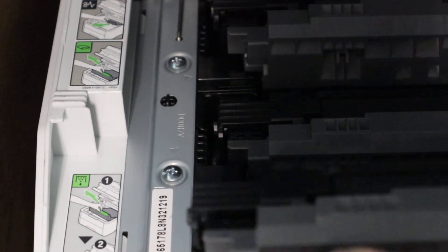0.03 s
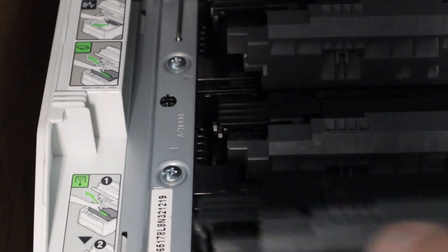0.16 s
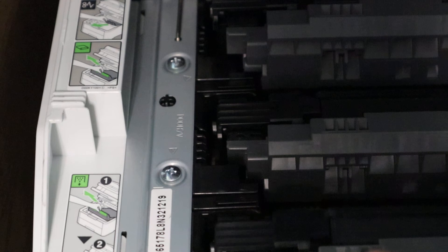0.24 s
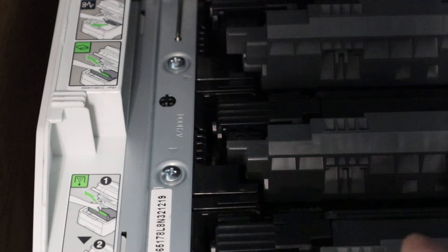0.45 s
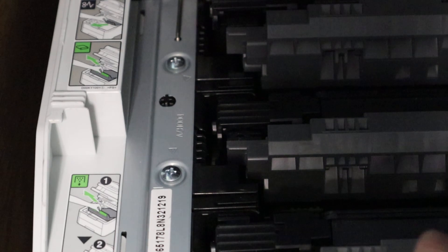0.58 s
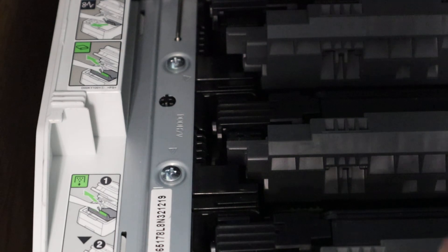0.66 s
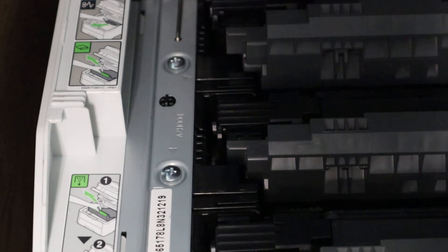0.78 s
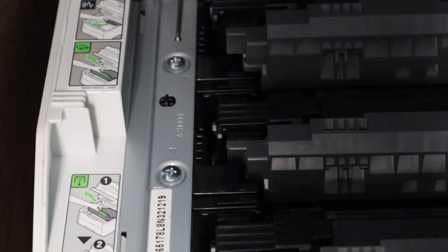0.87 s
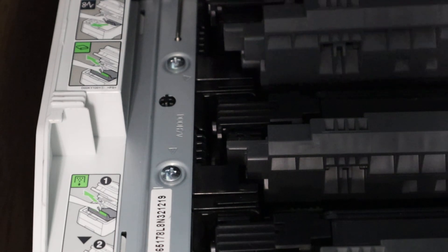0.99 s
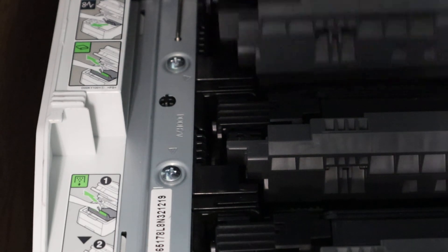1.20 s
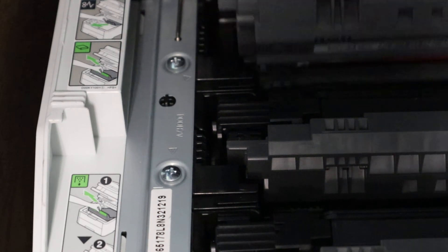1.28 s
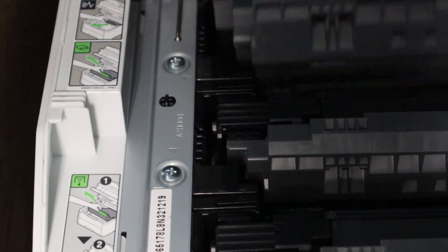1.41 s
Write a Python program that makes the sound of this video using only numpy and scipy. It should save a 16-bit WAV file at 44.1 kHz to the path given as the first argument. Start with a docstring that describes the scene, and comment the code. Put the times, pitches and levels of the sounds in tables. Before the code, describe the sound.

Close to the microphone, a toner cartridge slides down a printer's guides, chatters and clunks loudly into place. After a short pause come a light click and quiet plastic handling, with a faint machine hum in the small room.

```python
"""A faint machine hum fills a small room. Close up, a plastic toner cartridge ticks against an open
printer and scrapes down its guides, groaning as it sticks and slips while the frame rumbles.
It chatters past the latch and seats with a loud clunk that rings the chassis. A light click and a
soft knock follow, then the next cartridge is handled, its hollow shell rubbing and ticking."""
import sys
import numpy as np
from scipy import signal
from scipy.fft import rfft, irfft
from scipy.io import wavfile

SR = 44100
rng = np.random.default_rng(int(sys.argv[2]) if len(sys.argv) > 2 else 0)


def to_wav(s):
    """Save 16-bit WAV."""
    ch = np.atleast_2d(s).T  # columns
    pcm = np.round(np.clip(ch, -1, 1) * 32767)  # PCM
    wavfile.write(sys.argv[1], SR, pcm.astype(np.int16))


N = 63945
T = np.arange(N) / SR


def from_db(db):
    """Decibels to gain."""
    return 10 ** (np.asarray(db) / 20)


def unit_rms(x):
    """Normalise to an RMS of one."""
    return x / np.sqrt(np.mean(x ** 2) + 1e-20)


def fader(curve):
    """A gain ride through (time_s, level_db) points."""
    return from_db(np.interp(T, *np.transpose(curve)))


def at_hz(points, hz):
    """Read a curve on a log-frequency axis."""
    freq_hz, value = np.transpose(points)
    return np.interp(np.log(hz + 1e-9), np.log(freq_hz), value)


def coloured(x, eq):
    """Shape a steady signal with an EQ curve, then normalise it."""
    gain = from_db(at_hz(eq, np.fft.rfftfreq(len(x), 1 / SR)))
    return unit_rms(irfft(rfft(x) * gain, len(x)))


def drift(rate_hz):
    """A smooth random wobble, mostly slower than rate_hz."""
    rolloff = 1 + (np.fft.rfftfreq(N, 1 / SR) / rate_hz) ** 2
    return unit_rms(irfft(rfft(rng.standard_normal(N)) / rolloff, N))


def add(out, start_s, x):
    """Drop a sound onto the timeline."""
    i = int(start_s * SR)
    out[i:i + len(x)] += x[:max(N - i, 0)]


def strike(t, attack_s, t60_s):
    """Percussive envelope: quick rise, exponential decay."""
    return (1 - np.exp(-t / attack_s)) * from_db(-60 * t / t60_s)


# Tone colour of the room air: freq_hz, gain_db
AIR_EQ = [(25, 3), (60, 5), (100, -12), (160, -2.5), (200, -4.5), (280, -11), (340, -3.5), (600, -5),
          (720, -7.5), (1800, -15.5), (2150, -15), (3000, -19.5), (4300, -18.5), (4900, -18.5),
          (5650, -18.5), (6200, -23), (9000, -25), (12000, -25), (15500, -29.5)]
# Tones of the machine hum: pitch_hz, level_db
HUM_TONES = [(118.4, -60.5), (158, -62.5), (280, -62.5), (523.5, -58.5), (580, -59), (647, -58),
             (1109, -67), (1200, -66.5), (2158, -62.5), (4813, -75), (5604, -74.5)]

def background(air_db=-49.5, waver_rad=0.4, flutter=0.2):
    """The bed: room air and the wavering tones of a running machine."""
    hum = np.zeros(N)
    for hz, db in HUM_TONES:
        phase = 2 * np.pi * (hz * T + rng.random()) + waver_rad * drift(5)
        hum += from_db(db) * np.sqrt(2) * np.sin(phase) * (1 + flutter * drift(2.9))
    return hum + from_db(air_db) * coloured(rng.standard_normal(N), AIR_EQ)


# Reverb decay: freq_hz, t60_s
ROOM_DECAY = [(60, 0.4), (400, 0.36), (1500, 0.29), (5000, 0.27), (15000, 0.16)]
# Reverb tone colour: freq_hz, gain_db
ROOM_EQ = [(60, -19), (300, -0.5), (900, -6.5), (2500, -8.5), (6000, -13.5), (15000, -10)]

def room(x, build_s=0.0071):
    """Diffuse reflections from the printer's bay and the room; the treble dies first."""
    t, tail = T[:SR // 2], 0
    edges_hz = 40 * 2 ** np.arange(0, 9.1, .5)  # half-octave bands
    for low, high in zip(edges_hz, edges_hz[1:]):
        hz = np.sqrt(low * high)
        bandpass = signal.butter(2, [low, high], "band", fs=SR, output="sos")
        band = signal.sosfilt(bandpass, rng.standard_normal(len(t)))
        band *= strike(t, build_s, at_hz(ROOM_DECAY, hz))
        to_unity = np.sqrt(2 * (high - low) / SR / np.sum(band ** 2))
        tail += band * to_unity * from_db(at_hz(ROOM_EQ, hz))
    return signal.fftconvolve(x, tail)[:N]


# Swells of the frame's rumble: time_s, level_db
RUMBLE_RIDE = [(.16, -49), (.22, -35), (.26, -25.5), (.3, -38), (.33, -34), (.365, -27.5), (.39, -27.5),
               (.43, -36.5), (.47, -45.5), (.55, -60), (1.04, -63), (1.11, -39), (1.16, -55), (1.24, -51),
               (1.3, -44), (1.34, -44.5), (1.38, -38.5), (1.45, -41)]
# Its dark tone colour: freq_hz, gain_db
RUMBLE_EQ = [(25, 2), (50, -4), (92, 0.5), (125, -12.5), (200, -8), (300, -6), (450, -7), (620, -4.5),
             (1200, -22), (3000, -57)]

def frame_rumble():
    """The frame's dense low modes stir under the push, after the stop and under the hands."""
    return fader(RUMBLE_RIDE) * coloured(rng.standard_normal(N), RUMBLE_EQ)


def friction(eq, slips_per_s, spread_db, hiss):
    """Rubbing texture: tiny slips of uneven size over a smooth hiss."""
    slips = rng.random(N) < slips_per_s / SR
    sizes = from_db(spread_db * np.minimum(rng.exponential(1, N), 3))
    grit = unit_rms(slips * sizes * rng.choice([-1, 1], N))
    return coloured(grit + hiss * rng.standard_normal(N), eq)


# Swells of the hand rubs: time_s, level_db
HANDLING_RIDE = [(.7, -77), (.76, -55), (.83, -54), (.9, -86), (1.03, -53), (1.06, -39.5), (1.1, -40.5),
                 (1.13, -49), (1.155, -65), (1.21, -55), (1.25, -39.5), (1.272, -46.5), (1.305, -40),
                 (1.352, -45), (1.395, -36.5), (1.45, -36.5)]
# Their tone colour: freq_hz, gain_db
HANDLING_EQ = [(25, -4), (85, 2), (140, 3.5), (220, -4.5), (500, -5), (1100, -6.5), (2000, -8.5),
               (3200, -9.5), (5200, -10), (7000, -14.5), (11000, -21.5), (16000, -33)]

def handling():
    """Hands rub softly over plastic."""
    return fader(HANDLING_RIDE) * friction(HANDLING_EQ, slips_per_s=1300, spread_db=3.0, hiss=0.82)


# Swell of the groan: time_s, level_db
GROAN_RIDE = [(.17, -71), (.202, -34.5), (.222, -31), (.245, -33.5), (.28, -62.5)]

def groan(pitch_hz=443.8, waver=0.0375, flutter=0.44):
    """The shell sticks and slips, giving a short, rough tone."""
    phase = 2 * np.pi * np.cumsum(pitch_hz * (1 + waver * drift(100))) / SR
    return fader(GROAN_RIDE) * np.sqrt(2) * np.sin(phase) * (1 + flutter * drift(150))


# Swell of the scrape in the guides: time_s, level_db
SLIDE_RIDE = [(.08, -66), (.1, -53), (.175, -60.5), (.2, -34), (.228, -37), (.243, -23.5), (.262, -24),
              (.285, -22), (.305, -21), (.32, -24.5), (.35, -26.5), (.39, -41), (.44, -64), (.5, -83)]
# Its tone colour: freq_hz, gain_db
SLIDE_EQ = [(40, -33), (90, 9), (200, -5), (500, -5.5), (1000, -3.5), (1600, -2.5), (3200, -7),
            (5000, -2.5), (6700, -12), (9500, -12), (13000, -20.5), (16000, -34)]

def slide():
    """The cartridge scrapes down its guides with a fine, dense grain."""
    return fader(SLIDE_RIDE) * friction(SLIDE_EQ, slips_per_s=3200, spread_db=2.0, hiss=0.62)


# Resonances of the plastic shell: pitch_hz, width_hz, gain_db
SHELL_MODES = [(1090, 55, -3), (2360, 30, -13), (2820, 32, -6.5), (3106, 28, 2), (3330, 54, -1),
               (3580, 64, -7), (4370, 52, -1), (4745, 86, -5), (5185, 140, -4), (8650, 51, -4)]

def shell(x):
    """The cartridge's narrow resonances ring on after clicks and rubs."""
    out = x.copy()
    for hz, width_hz, db in SHELL_MODES:
        radius = np.exp(-np.pi * width_hz / SR)
        feedforward = np.array([1, 0, -1]) * (1 - radius ** 2) / 2
        feedback = [1, -2 * radius * np.cos(2 * np.pi * hz / SR), radius ** 2]
        out += from_db(db) * signal.lfilter(feedforward, feedback, x + 1e-18)
    return out


# Dull knocks on the shell: start_s, level_db, pitch_hz, t60_s
KNOCK_CUES = [(.093, -38, 106, 0.12), (.107, -29.5, 375, 0.037), (.152, -37.5, 133, 0.17),
              (.2535, -17.5, 750, 0.033), (.342, -14.5, 280, .02), (.358, -19, 423, 0.044),
              (.386, -17.5, 293, 0.032), (.744, -53, 597, 0.031), (0.752, -47, 105.4, 0.57),
              (1.041, -28.5, 675, 0.038), (1.044, -35, 1406, 0.047), (1.076, -18.5, 840, .015),
              (1.084, -32.5, 134, 0.28), (1.09, -31, 418, 0.052), (1.29, -33, 81, 0.24),
              (1.316, -33, 138, 0.12), (1.365, -25.5, 283, 0.027), (1.447, -22, 537, .03)]

def knocks(attack_s=0.0006):
    """Each soft blow rings the hollow shell at a single pitch."""
    out, t = np.zeros(N), T[:SR // 2]
    for start_s, db, hz, t60_s in KNOCK_CUES:
        add(out, start_s, from_db(db) * np.sin(2 * np.pi * hz * t) * strike(t, attack_s, t60_s))
    return out


# Hard plastic contacts: start_s, level_db, tilt_db_per_octave, ring_hz, ring_gain_db, t60_s
CLICK_CUES = [(0.091, -37.5, -3, 4300, 4.5, 0.072), (0.099, -37, -3, 4440, 12, 0.041),
              (0.148, -42.5, -3.5, 900, -5, 0.23), (0.1807, -28.5, -2, 2600, 7, 0.05),
              (.1935, -30, -3, 5500, 16, 0.039), (0.232, -30.5, 13, 5500, 16, 0.085),
              (0.2364, -21.5, -3, 860, 19, 0.1), (0.2489, -17, -0.5, 4800, -15, 0.017),
              (0.2647, -7.5, -0.5, 4840, 7, 0.019), (.270, -10, 0.2, 5000, 1, 0.037),
              (.2825, -16.5, 4, 8900, 7, 0.062), (0.289, -23, 2, 4000, -3, 0.06),
              (.297, -22, 0, 12500, 10, 0.031), (0.314, -18, 1.5, 5240, 5, 0.025),
              (.322, -8.5, -1, 3070, 2, .04), (.3272, -8.5, 2.7, 8700, -2.5, 0.043),
              (.330, -9.5, -1.5, 1550, 4.5, 0.069), (.738, -48.5, 0.5, 800, 16, 0.28),
              (.789, -54.5, 7, 4500, 3, 0.26), (1.0217, -36.5, 3, 9000, 3, 0.036),
              (1.040, -23.5, 4, 4300, 5, 0.039), (1.052, -37.5, 2, 4500, 5, 0.085),
              (1.0762, -35, -3, 11000, 16, 0.046), (1.2182, -40.5, -2.7, 3030, 3, 0.13),
              (1.2327, -38, -5, 5200, 11, 0.035), (1.2423, -35.5, -7.5, 4900, 17, .06),
              (1.2789, -34.5, -0.5, 6000, 6, 0.055), (1.291, -32, 0, 4640, 14, .04),
              (1.2948, -25, .5, 4970, 12, 0.055), (1.3352, -33, 1.8, 1040, 13, 0.054),
              (1.3602, -32, 4.5, 4960, 6.5, 0.064), (1.384, -27, 12, 6000, 26, 0.044),
              (1.3873, -20, 2.8, 4600, 9, 0.027), (1.399, -33.5, 2, 2560, 3.5, 0.19),
              (1.42, -30, -0.2, 1460, 19, 0.12), (1.447, -27, 6, 4320, -4, .05)]
# Tone colour common to all clicks: freq_hz, gain_db
CLICK_EQ = [(40, -14), (200, -7.5), (900, -2), (1600, -3), (4500, -6), (7000, -8.5), (11000, -11.5),
            (16000, -25)]

def clicks(attack_s=0.00058, ring_octaves=0.29, size=8192):
    """Each contact is a crack of dense plastic modes, with its own tilt and one peak or dip."""
    out, hz = np.zeros(N), np.fft.rfftfreq(size, 1 / SR) + 1
    for start_s, db, tilt, ring_hz, ring_db, t60_s in CLICK_CUES:
        bell = np.exp(-.5 * (np.log2(hz / ring_hz) / ring_octaves) ** 2)
        eq_db = at_hz(CLICK_EQ, hz) + tilt * np.log2(np.maximum(hz, 300)) + ring_db * bell
        modes = unit_rms(irfft(rfft(rng.standard_normal(size)) * from_db(eq_db)))
        add(out, start_s, from_db(db) * modes * strike(T[:size], attack_s, t60_s))
    return out


# Ring of the printer's chassis: pitch_hz, level_db, t60_s
CHASSIS_MODES = [(93.8, -26, .4), (152, -20, 0.24), (262, -23, 0.19), (278.3, -15, 0.067), (366, -25, 0.25),
                 (410, -28, .22), (572, -23, 0.11), (750, -6, 0.021), (842, 2, .02), (932, -4.5, 0.031),
                 (1068, -5, 0.037), (1120, -20, 0.15), (1714, -28, 0.1), (2079, -27, 0.19),
                 (2841, -21, 0.079), (3100, -17, 0.066), (3294, -30, 0.071)]

def clunk(start_s=0.3315, contact_s=0.0016):
    """The main hit: the cartridge meets its stop and sets the chassis ringing."""
    out, t = np.zeros(N), T[:SR]
    for hz, db, t60_s in CHASSIS_MODES:
        add(out, start_s, from_db(db) * np.sin(2 * np.pi * hz * t) * strike(t, contact_s, t60_s))
    return out


def scene():
    """Mono mix: bright plastic, hollow body and their reflections over the background bed."""
    rubbing = slide() + handling()
    bright = shell(clicks() + rubbing)
    hollow = knocks() + clunk() + groan() + frame_rumble()
    reflections = room(bright + from_db(-9.5) * hollow)  # the hollow layer reaches the room more weakly
    return (from_db(0.5) * (bright + hollow + reflections) + background())[None]


def record(dry, low_cut_hz=38, high_cut_hz=16000):
    """Trim the deepest rumble, clip any peak over full scale and cut the very top."""
    low_cut = signal.butter(2, low_cut_hz, "high", fs=SR, output="sos")
    high_cut = signal.ellip(12, .1, 70, high_cut_hz, fs=SR, output="sos")
    clipped = np.clip(signal.sosfilt(low_cut, dry), -1, 1)
    return signal.sosfilt(high_cut, clipped)


dry = scene()
out = record(dry)
to_wav(out)
```